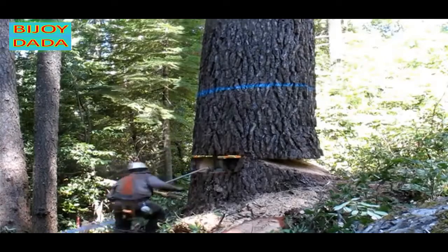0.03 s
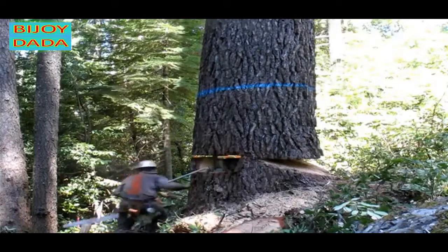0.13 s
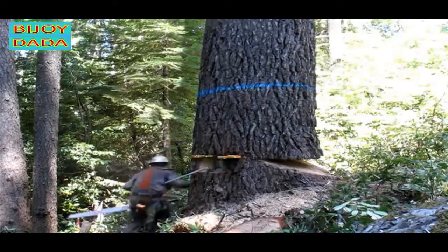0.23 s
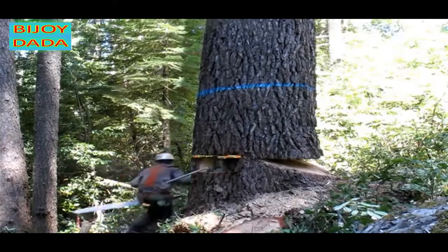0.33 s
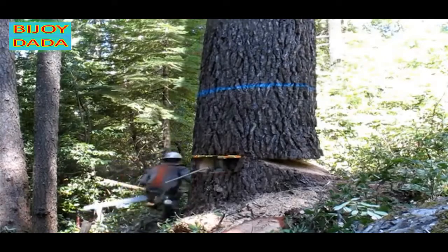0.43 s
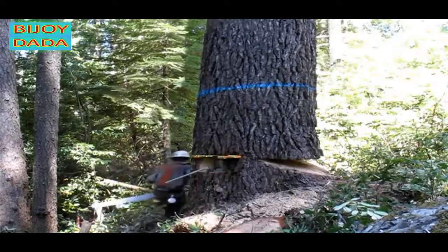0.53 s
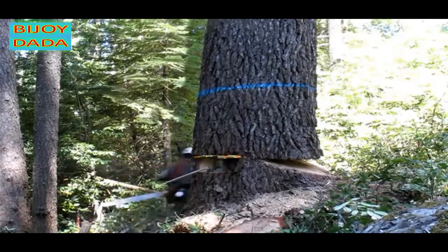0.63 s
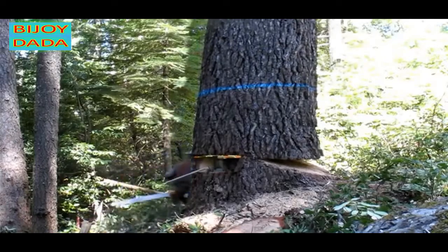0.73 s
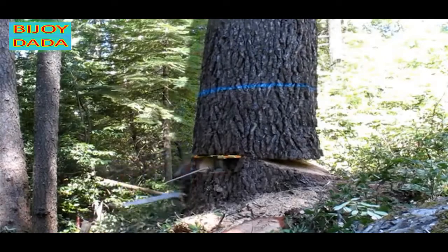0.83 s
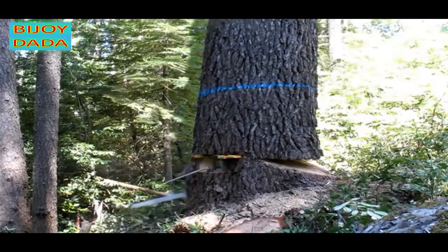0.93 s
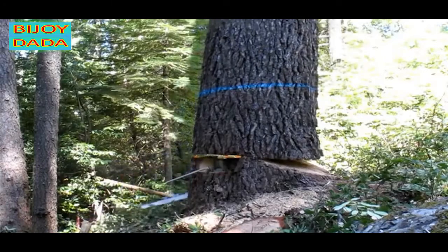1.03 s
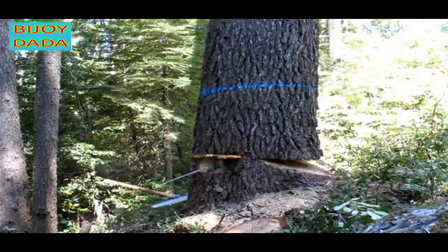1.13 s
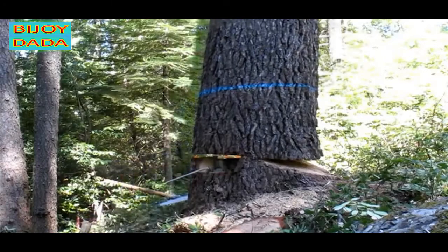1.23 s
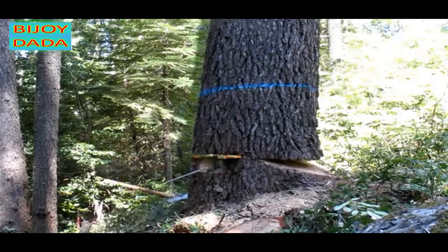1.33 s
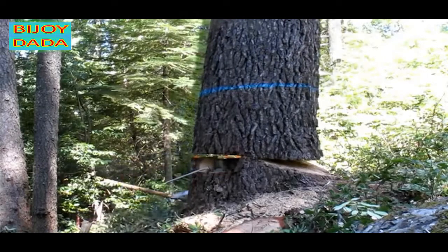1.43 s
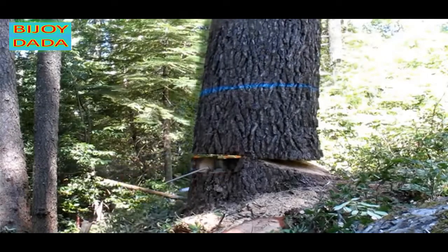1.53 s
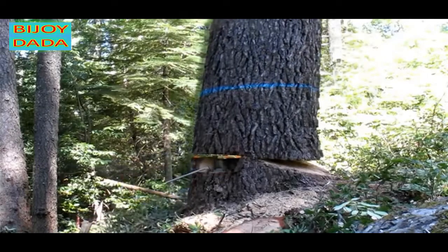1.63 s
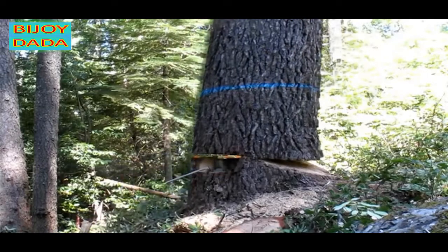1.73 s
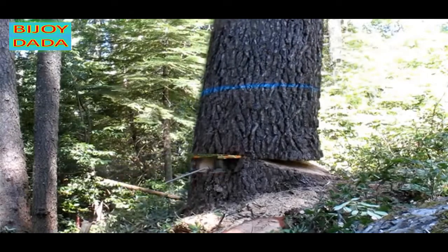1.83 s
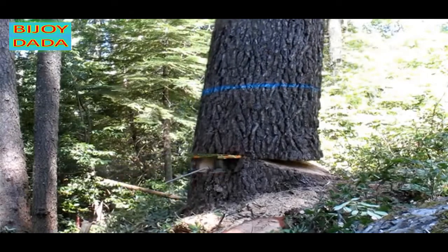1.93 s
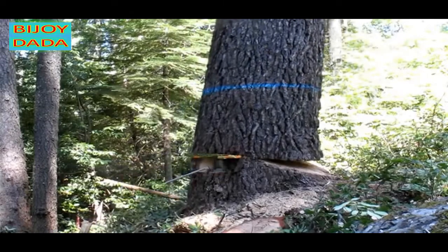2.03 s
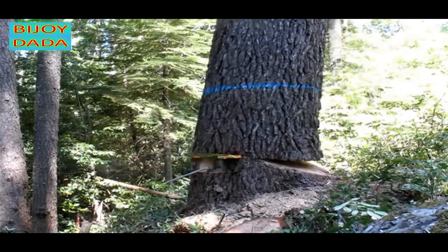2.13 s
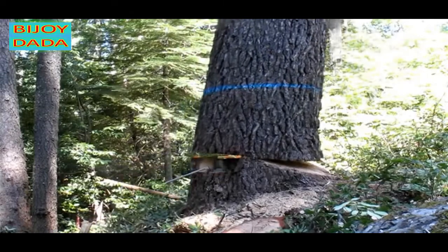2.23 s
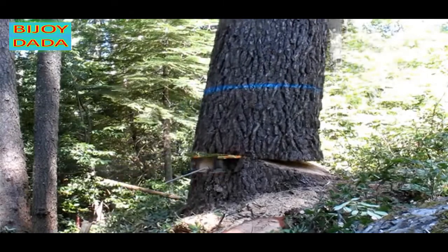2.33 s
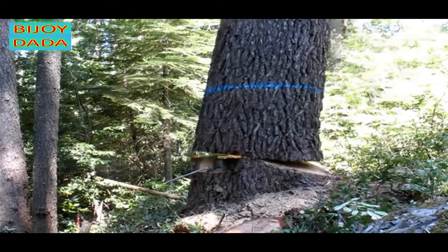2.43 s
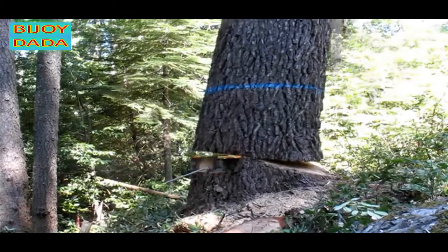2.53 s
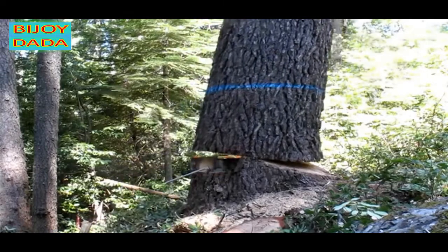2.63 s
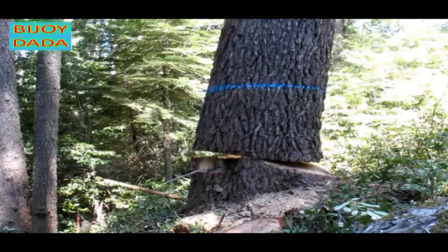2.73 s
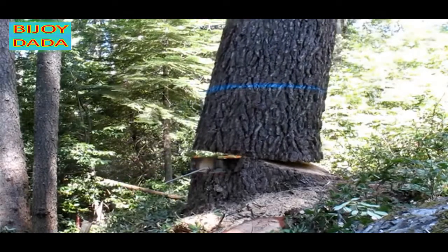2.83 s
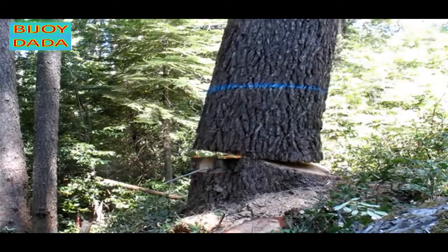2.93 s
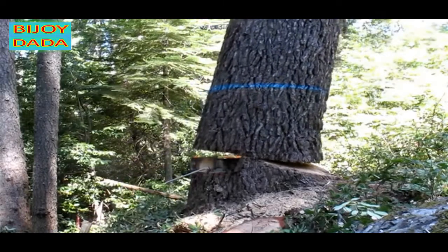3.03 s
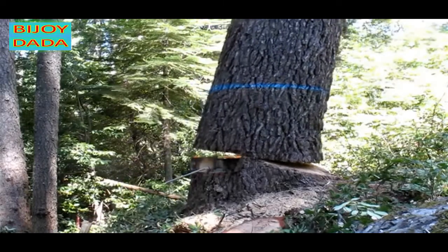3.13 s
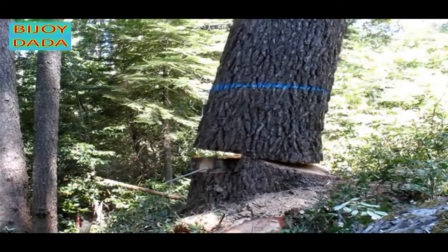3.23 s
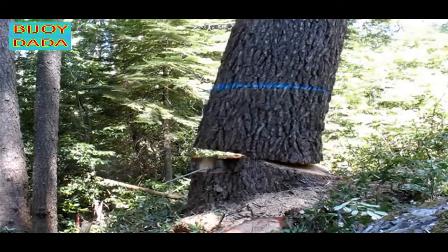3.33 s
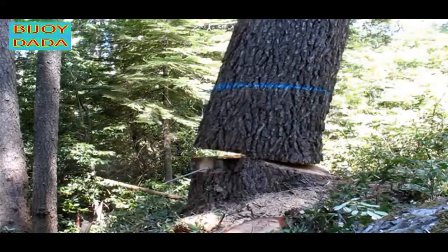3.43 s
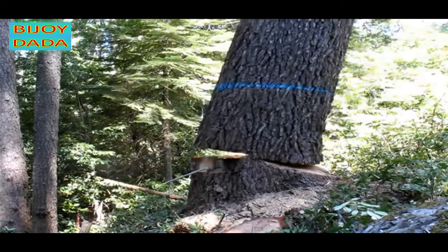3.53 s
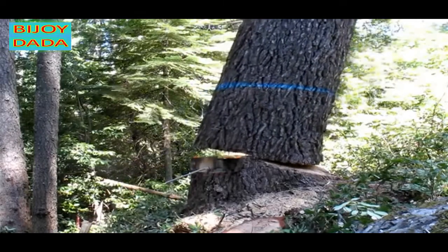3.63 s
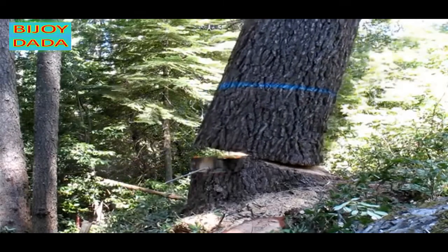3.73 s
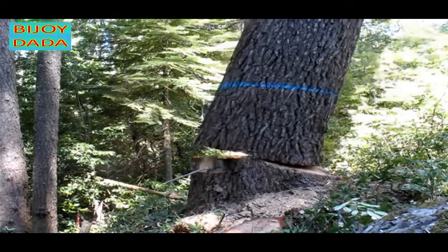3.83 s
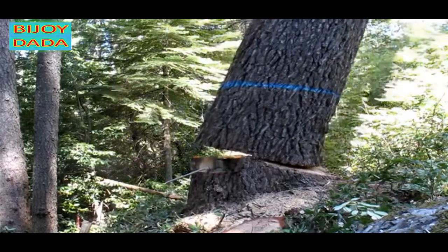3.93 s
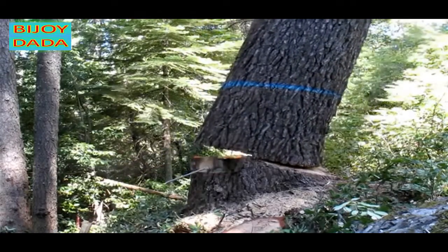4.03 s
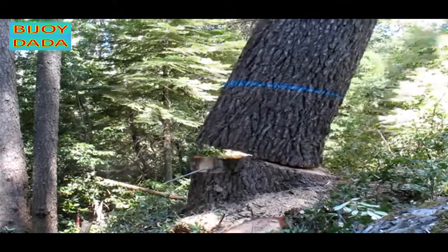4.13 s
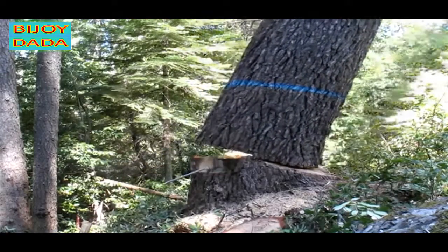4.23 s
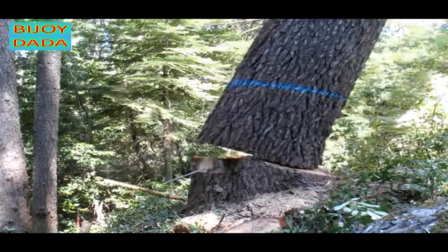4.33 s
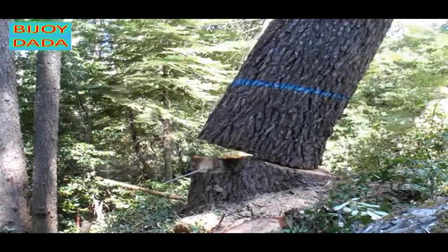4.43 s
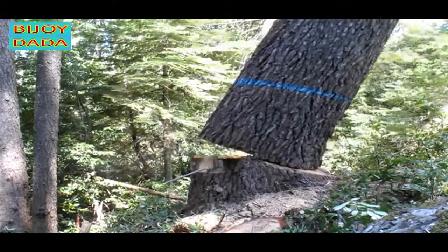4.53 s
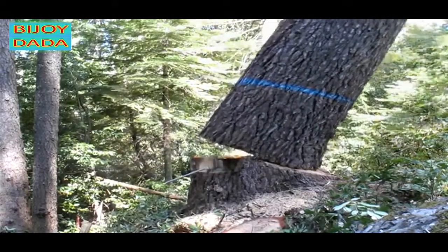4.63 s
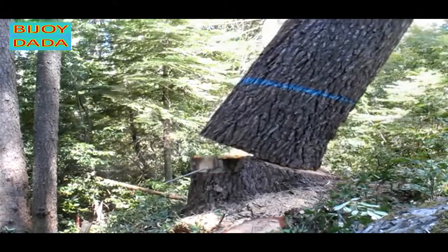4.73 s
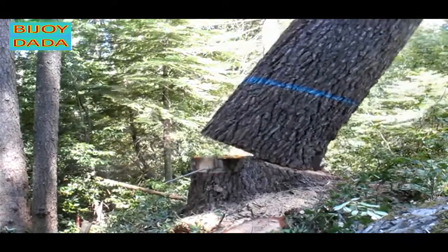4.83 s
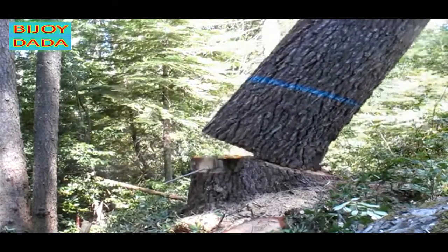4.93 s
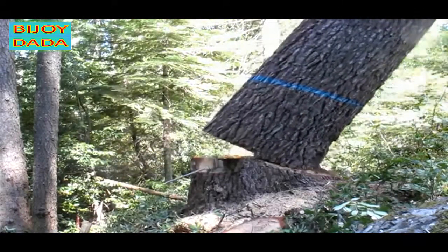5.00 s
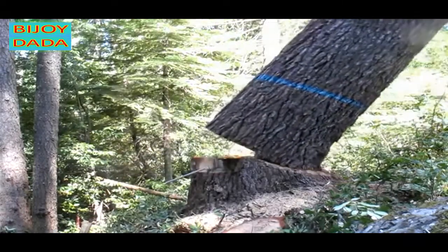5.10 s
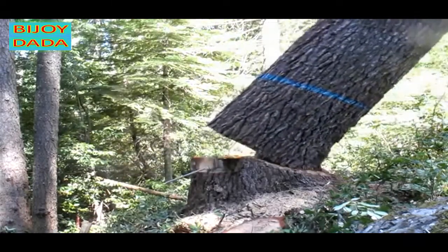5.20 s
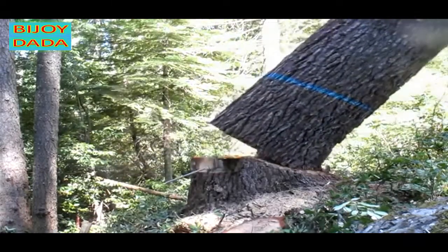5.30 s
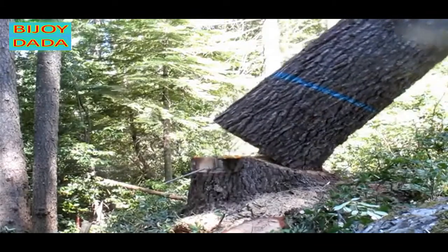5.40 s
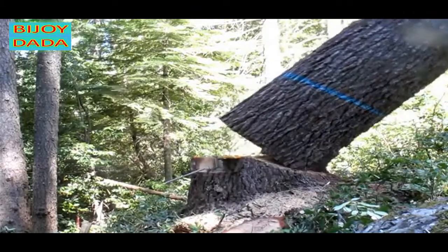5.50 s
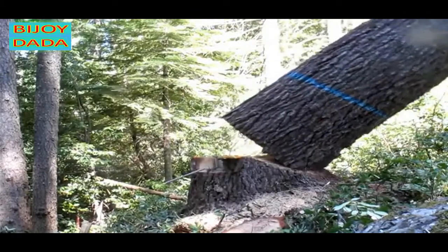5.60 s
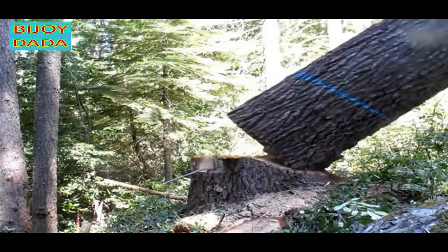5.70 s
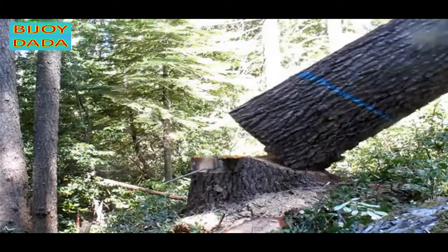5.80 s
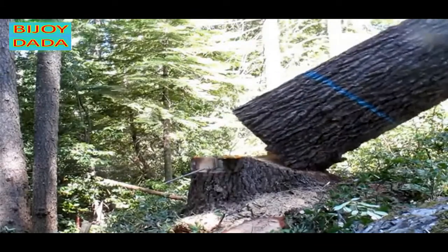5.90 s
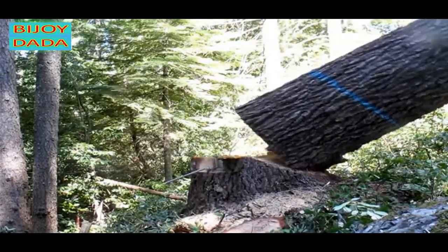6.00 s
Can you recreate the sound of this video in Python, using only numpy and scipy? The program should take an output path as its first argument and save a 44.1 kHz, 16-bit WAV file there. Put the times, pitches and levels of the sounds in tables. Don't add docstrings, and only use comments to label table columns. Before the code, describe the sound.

Soft twig crackles and leaf rustle over low forest air, then a loud isolated wood crack. After a pause, irregular snaps, ticks and deeper splits tumble out with showers of bark and needles. The pops thin a little before the crown breaks through branches in a loud rattling crunch, still going at the end. Slightly dull, compressed small microphone, faint high whine, woodland echo.

```python
import sys
import numpy as np
from scipy import signal
from scipy.fft import rfft, irfft
from scipy.io import wavfile
from scipy.ndimage import uniform_filter1d

SR = 44100
rng = np.random.default_rng(int(sys.argv[2]) if len(sys.argv) > 2 else 0)


def pcm_store(signal):
    levels = np.round(np.clip(np.atleast_2d(signal), -1, 1) * 32767)
    wavfile.write(sys.argv[1], SR, levels.astype(np.int16).T)


def field_ratio(decibels):
    return 10 ** (np.asarray(decibels, dtype=float) / 20)


N = 267201
BURST_N = 2000
BURST_MS = np.arange(BURST_N) * 1000 / SR


def unit(x):
    return x / np.sqrt(np.mean(x ** 2) + 1e-20)


def level_curve(table):
    s, db = np.transpose(table)
    return np.interp(np.arange(N) / SR, s, db)


def colour(x, spectrum):
    hz, db = np.transpose(spectrum)
    grid_hz = np.arange(2049) * SR / 4096 + 1
    log_gain = np.interp(np.log(grid_hz), np.log(hz), db) * np.log(10) / 20
    cepstrum = irfft(log_gain)
    cepstrum[1:2048] *= 2
    cepstrum[2049:] = 0
    return signal.fftconvolve(x, irfft(np.exp(rfft(cepstrum))))[:len(x)]


def ring(x, hz, width_hz):
    r = np.exp(-np.pi * width_hz / SR)
    return signal.lfilter([1, 0, -r], [1, -2 * r * np.cos(2 * np.pi * hz / SR), r * r], x)


def walk(rate_hz):
    hold = int(SR / rate_hz)
    steps = np.repeat(rng.standard_normal(N // hold + 1), hold)
    return unit(uniform_filter1d(uniform_filter1d(steps, hold), hold)[:N])


def grains(rate_hz, spread_db, smear_ms):
    chance, size, noise = rng.random(N), rng.exponential(size=N), rng.standard_normal(N)
    hits = (chance < rate_hz / SR) * field_ratio(spread_db * np.minimum(size, 4))
    fade = np.exp(-1000 / (max(smear_ms, .05) * SR))
    return unit(noise * np.sqrt(signal.lfilter([1], [1, -fade], hits ** 2)))


def swells(table, rise_share):
    t = np.arange(N) / SR
    power = 0
    for s, db, fade_s in table:
        away_s = np.where(t > s, t - s, (s - t) / rise_share)
        power = power + field_ratio(2 * db - 20 * away_s / fade_s)
    return power


def blows(table, push_ms, width_hz, gain_db):
    out = np.zeros(N + BURST_N)
    for s, db, hz in table:
        push = rng.standard_normal(BURST_N) * BURST_MS * np.exp(-BURST_MS / push_ms)
        knock = ring(ring(push, hz, width_hz), hz, 2 * width_hz)
        at = int(s * SR)
        out[at:at + BURST_N] += field_ratio(db + gain_db) * knock / np.abs(knock).max()
    return out[:N]


# (time [s], wood ring [dB],
# pitch [Hz], thud [dB], tear [ms])
SPLITS = [(1.001, -63, 900, -63, 2.1), (1.7225, -21, 1700, -29, 2.3), (2.317, -23.5, 1150, -32, 2.7),
          (2.385, -39, 1600, -70, 4.7), (2.597, -30.5, 1400, -37, 2.8), (2.9045, -26.5, 1080, -36, 3.6),
          (3.117, -27.5, 1450, -34.5, 3.6), (3.255, -43.5, 2500, -60, 6.3), (3.265, -40, 2760, -70, 4),
          (3.316, -38, 950, -43, 6.3), (3.411, -30.5, 1170, -37.5, 8.5), (3.508, -38.5, 1050, -45, 3.9),
          (3.769, -39.5, 1150, -46.5, 6.7), (3.799, -32.5, 1500, -35, 5), (3.811, -54, 930, -52, 3.2),
          (3.997, -44, 1700, -48.5, 3.5), (4.2, -47, 1610, -54, 10), (4.219, -47, 2800, -52, 3),
          (4.395, -40, 1240, -48, 11), (4.609, -47.5, 1500, -49.5, 12), (4.765, -45, 1650, -70, 1.9)]
# (time [s], wood ring [dB], pitch [Hz], thud [dB], tear [ms])
LIMB_BREAKS = [(4.866, -43, 1390, -51, 2.3), (4.983, -45, 1600, -51, 2.1), (5.224, -44, 1150, -62, .8),
               (5.278, -50, 2610, -40.5, 1.2), (5.484, -29.5, 950, -46, 5.3), (5.602, -43, 3190, -46, 1.9),
               (5.654, -32.5, 1120, -44, 1.3), (5.705, -37, 1520, -41, 1.2), (5.831, -34, 1100, -40.5, 4),
               (5.966, -36, 1390, -39, 3.1)]
# (time [s], splinter [dB], wood ring [dB], pitch [Hz], tear [ms])
SNAPS = [(2.238, -42, -39, 4100, .9), (2.317, -44, -50, 3000, 2.7), (2.538, -33.5, -35, 1400, 4.9),
         (2.552, -39, -39, 1900, 3.5), (2.717, -26.5, -23.5, 1940, 4.2), (2.781, -38, -35, 4100, 12),
         (2.811, -36, -36, 3430, 5.7), (2.889, -33.5, -41, 4220, 3), (3.007, -35, -39, 1900, 5.8),
         (3.139, -38, -37.5, 3750, 5.5), (3.199, -35.5, -44, 1790, 6), (3.393, -35.5, -38, 1900, 1.4),
         (3.434, -27, -35, 1400, 3.2), (3.537, -33.5, -37.5, 1700, 2.7), (3.9, -33, -40.5, 3620, 8.7),
         (3.959, -38, -35.5, 2940, 3.1), (3.98, -29, -31.5, 3800, 2.1), (4.039, -40, -37, 3300, 3.5),
         (4.363, -28, -33, 3500, 1.5), (4.677, -36.5, -52, 2330, 7.4), (4.696, -41.5, -45, 1430, 1.8),
         (4.781, -36.5, -40.5, 3600, 1.7)]
# (time [s], splinter [dB], wood ring [dB], pitch [Hz])
TICKS = [(2.301, -58, -80, 4130), (2.477, -44.5, -43, 2830), (2.515, -48, -47, 3800),
         (2.637, -54, -45.5, 3900), (2.661, -44.5, -45, 2300), (3.306, -48, -47, 2380),
         (3.369, -40.5, -45, 1770), (3.471, -42, -55, 1720), (3.549, -44, -66, 3450),
         (3.571, -46, -44, 3400), (3.656, -43, -59, 3190), (3.695, -40, -44, 2830), (3.712, -42, -48, 3960),
         (3.756, -42, -50, 1620), (3.283, -44, -43, 2200), (3.971, -44, -45, 2450),
         (4.112, -42.5, -57, 3400), (4.121, -42, -46, 1500), (4.302, -41.5, -48, 1600),
         (4.422, -43, -57, 2110), (4.549, -47, -48.5, 2000), (4.638, -49, -49, 1220),
         (4.74, -43.5, -46, 2850), (2.76, -44, -46, 3300), (2.678, -50, -47, 2300), (2.584, -46, -50, 3000),
         (3.382, -44, -44, 3300), (3.46, -47, -48, 3000), (3.68, -52, -52, 1500), (3.737, -50, -52, 3000),
         (3.887, -48, -47, 3300), (3.822, -46, -45, 3700), (3.949, -45, -48, 3000), (4.135, -50, -50, 3200),
         (4.235, -52, -49, 2000), (4.335, -52, -52, 3000), (4.41, -50, -47, 2500), (2.946, -50, -44, 1900)]
# (time [s], splinter [dB], wood ring [dB], pitch [Hz], tear [ms])
BRANCH_BREAKS = [(4.824, -40.5, -64, 3490, .8), (4.866, -43, -50, 3000, 2.3), (5.058, -36, -43, 2900, 4.7),
                 (5.111, -41, -39, 3960, 8.4), (5.189, -39.5, -53, 2450, 3),
                 (5.245, -30.5, -31.5, 2610, 1.2), (5.288, -34.5, -45, 1420, 7.5),
                 (5.32, -41, -32, 2420, 5), (5.373, -33.5, -27, 1800, 2.6), (5.422, -36, -30, 1050, 14),
                 (5.524, -39, -35, 1140, 6.4), (5.614, -36, -27, 1500, 2.7), (5.637, -28, -30, 3800, 1.1),
                 (5.719, -52, -35, 1380, 3.9), (5.769, -34, -34, 2870, 2.2), (5.831, -35, -45, 3000, 4),
                 (5.987, -33, -34, 1820, 2.1)]
# (time [s], splinter [dB], wood ring [dB], pitch [Hz], tear [ms])
TWIGS = [(0.074, -61, -65, 3700, 6.5), (0.126, -48, -64, 1890, 1.2), (0.154, -66, -60, 4200, 3.3),
         (0.178, -50.5, -55.5, 2060, 7.4), (0.287, -61, -77, 3730, 3), (0.41, -54, -56, 4300, 2.5),
         (0.511, -53.5, -61, 3510, 13.5), (0.548, -66, -57, 2600, 1.7), (0.727, -51, -69, 4200, 3.7),
         (0.976, -61, -63, 4030, 2.5), (1.499, -51.5, -62, 1940, 3.9), (1.552, -63, -57, 3000, 5),
         (1.589, -61, -58, 3060, 8)]


def fractures():
    strands = [(*tick, 3.5) for tick in TICKS]
    thick = [(s, thud, wood, hz, wood - 22, ms) for s, wood, hz, thud, ms in SPLITS + LIMB_BREAKS]
    thin = [(s, wood - 22, wood, hz, splinter, ms)
            for s, splinter, wood, hz, ms in TWIGS + SNAPS + BRANCH_BREAKS + strands]
    return thick + thin


# (frequency [Hz], width [Hz], level [dB])
STUMP = [(560, 170, -9), (1070, 150, 0), (1380, 190, -7), (1750, 150, -1), (2300, 180, -2), (3050, 320, 3),
         (3750, 180, -3)]


def stump(x, hz, reach_oct):
    out = 0
    for mode_hz, width_hz, db in STUMP:
        distance = np.log2(mode_hz / hz) / reach_oct
        out = out + field_ratio(db - 6 * min(distance ** 2, 3)) * unit(ring(x, mode_hz, width_hz))
    return out


# (time [s], centre [Hz], reach [octaves])
RINGING = [(1.7225, 1900, 2.2), (2.317, 1050, .75), (2.597, 2200, 1.5), (2.717, 2250, .75),
           (2.9045, 1090, .35), (3.117, 1500, 1.2), (3.316, 1100, .6), (3.411, 1400, .7), (3.508, 1200, .7),
           (3.799, 1400, .9)]


def wood_ring(s, hz, first, middle):
    wood = unit(ring(middle, hz, 660)) + 0.87 * unit(ring(first, 2300 + 1400 * rng.random(), 2700))
    wood = unit(signal.sosfilt(signal.butter(2, [700, 4000], "band", fs=SR, output="sos"), wood))
    for split_s, centre_hz, reach_oct in RINGING:
        if abs(split_s - s) < .005:
            wood = .25 * wood + .75 * unit(stump(middle, centre_hz, reach_oct))
    if s > 5.0 and hz < 2000:
        wood = unit(.6 * wood + unit(ring(ring(middle, hz, 350), hz, 700)))
    return wood


def cracks():
    near, sent = np.zeros(N + 4000), np.zeros(N + 4000)
    ms = BURST_MS
    click = np.eye(1, BURST_N)[0]
    sharp = signal.butter(2, 3800.5, "high", fs=SR, output="sos")
    deep = unit(ring(click, 90, 85))
    scale = np.sqrt(441 / BURST_N)
    for s, thud_db, wood_db, hz, splinter_db, tear_ms in fractures():
        noise, size = rng.standard_normal((3, BURST_N)), rng.exponential(size=BURST_N)
        tear = np.clip(tear_ms, .8, 14)
        snaps = noise * size ** 0.56 * (1 - np.exp(-ms / 0.2))
        first, middle, last = (run / (1 + (ms / (share * tear)) ** 1.7)
                               for run, share in zip(snaps, (.45, .65, .85)))
        wood = wood_ring(s, hz, first, middle)
        thud = unit(ring(ring(last, 500 + 90 * rng.random(), 320), 520, 600))
        low_thud = unit(ring(ring(last, 310, 240), 310, 340))
        spray = ring(first * np.exp(-ms / (.5 * tear)), 4700 + 3300 * rng.random(), 8000)
        chips = noise[2] * np.exp(-ms / 13)
        splinter = unit(signal.sosfilt(sharp, spray)) + 0.5 * unit(signal.sosfilt(sharp, chips))
        boom = field_ratio(thud_db - 25.5) * deep
        crack = field_ratio(thud_db - 13) * low_thud + field_ratio(thud_db - 1.2) * thud
        crack = crack + field_ratio(wood_db) * wood + field_ratio(splinter_db) * splinter
        broad = field_ratio(thud_db + .1) * unit(ring(click, 480, 500))
        broad = broad + field_ratio(wood_db) * unit(ring(click, .65 * hz + 550, 1500))
        broad = broad + field_ratio(splinter_db + 0.3) * unit(signal.sosfilt(sharp, click))
        at = int(s * SR)
        near[at:at + BURST_N] += (crack + boom) * scale
        sent[at:at + BURST_N] += (broad + boom) * scale
    lag = int(.0131 * SR)
    near[lag:] += field_ratio(-22) * near[:-lag]
    return near[:N], sent[:N]


# (peak time [s], level [dB], fade [s per 10 dB])
FRAY = [(2.38, -50, .2), (2.61, -44, .03), (2.74, -42, .07), (2.93, -37, .05), (3.14, -48, .3),
        (3.41, -41, .11), (3.77, -40.5, .1), (3.98, -44, .12), (4.2, -48, .2), (4.38, -46, .2),
        (4.58, -46, .5), (4.93, -47, .08), (4.7, -48, .03), (4.86, -44, .04)]
# (frequency [Hz], density [dB per Hz])
THICK = [(100, -21), (400, 0.5), (1200, 4), (3000, 6), (6000, -1), (12000, -39)]


def fray():
    pops = unit(colour(grains(420, 3.3, 0.7), THICK))
    return field_ratio(-5.5) * np.sqrt(swells(FRAY, rise_share=.2)) * pops


# (time [s], level [dB])
CRASH = [
    (4.8, -55),
    (5.08, -51),
    (5.18, -50.5),
    (5.24, -39),
    (5.3, -42),
    (5.36, -36.5),
    (5.51, -37.5),
    (5.59, -36),
    (6.06, -37.5),
]
# (frequency [Hz], density [dB per Hz])
BRANCH = [(600, -15), (880, -14), (1100, -.5), (1600, 1), (2000, -2), (3300, -4.5), (6000, -9.5),
          (12000, -43)]
# (frequency [Hz], density [dB per Hz])
LIMB = [(25, -27), (55, -8), (110, -6), (175, 3), (370, -2.5), (600, -5), (900, -17), (1500, -44.5)]


def crash():
    branch_db = level_curve([(CRASH[0][0] - .2, -90)] + list(CRASH))
    lead_s = .04
    limb_db = np.interp(np.arange(N) + lead_s * SR, np.arange(N), branch_db) * 1.3 + 1.5
    rattle = 0
    for hz in 800 * 1.5 ** np.arange(6):
        band = signal.butter(2, [hz / 1.25, hz * 1.25], "band", fs=SR, output="sos")
        rattle = rattle + signal.sosfilt(band, grains(300, 3.1, 2.4))
    branch = unit(colour(rattle, BRANCH))
    limb = unit(colour(grains(200, 2.6, 5.5), LIMB))
    return field_ratio(branch_db) * branch + field_ratio(limb_db) * limb


# (time [s], peak [dB], pitch [Hz])
KNOCKS = [(5.0357, -42, 1260), (5.0582, -37, 1310), (5.1001, -40, 1270), (5.1161, -39, 2160),
          (5.1919, -41, 2270), (5.2243, -30, 1250), (5.2433, -27, 1180), (5.2767, -31, 1300),
          (5.3206, -27, 2300), (5.3595, -22, 1590), (5.374, -19, 1530), (5.3994, -25, 1620),
          (5.4279, -26, 2300), (5.4279, -24, 1590), (5.4857, -22, 1100), (5.5082, -28, 1610),
          (5.5221, -25, 1120), (5.5526, -27, 1400), (5.57, -29, 1180), (5.6139, -20, 1610),
          (5.6374, -22, 1330), (5.6543, -21, 1670), (5.7027, -22, 1630), (5.7187, -21, 1420),
          (5.7536, -27, 1790), (5.7955, -28, 1460), (5.8304, -27, 1610), (5.8589, -26, 1730),
          (5.8948, -24, 1550), (5.9252, -24, 1860), (5.9517, -27, 1360), (5.9671, -22, 1420),
          (5.9871, -23, 1800), (6.0165, -29, 2290), (6.033, -26, 1300)]


def knocks():
    return blows(KNOCKS, push_ms=.9, width_hz=330, gain_db=-2.5)


# (time [s], peak [dB], pitch [Hz])
THUMPS = [(5.079, -52, 234), (5.121, -47, 291), (5.159, -50, 172), (5.199, -37, 307), (5.22, -33, 482),
          (5.272, -31, 433), (5.289, -39, 223), (5.306, -30, 175), (5.359, -31, 385), (5.41, -30, 396),
          (5.439, -33, 439), (5.463, -35, 393), (5.507, -34, 353), (5.557, -30, 428), (5.574, -31, 471),
          (5.598, -27, 358), (5.639, -29, 345), (5.652, -26, 336), (5.687, -29, 264), (5.719, -32, 450),
          (5.757, -31, 301), (5.828, -26, 358), (5.854, -33, 234), (5.892, -29, 444), (5.924, -31, 191),
          (5.965, -22, 256), (5.977, -24, 320), (6.009, -34, 460), (6.049, -33, 323)]


def thumps():
    return blows(THUMPS, push_ms=1.6, width_hz=190, gain_db=-2.5)


# (time [s], peak [dB], pitch [Hz])
LURCHES = [
    (5.261, -58, 140),
    (5.265, -40, 94.2),
    (5.575, -51, 64.6),
]


def lurches():
    return blows(LURCHES, push_ms=4, width_hz=70, gain_db=-3)


# (time [s], peak [dB], pitch [Hz])
TAPS = [
    (.125, -45, 1900),
    (.177, -52, 2000),
]


def taps():
    return blows(TAPS, push_ms=.6, width_hz=180, gain_db=-1)


# (frequency [Hz], t60 [s], level [dB])
FOREST = [(73.7, 0.43, 5), (285, 0.59, -2), (476, 1.3, -6), (700, 1.7, -5), (1100, 1.12, -3),
          (1580, 1.07, -2.5), (2300, 1.08, -2.5), (3340, 0.52, -4), (4800, 0.8, -5), (7440, 0.76, -9)]


def forest(x):
    t = np.arange(int(1.5 * SR)) / SR
    trunks = rng.exponential(size=len(t) // 64 + 1).repeat(64)[:len(t)] ** .25
    build = np.clip((t - .008) / 0.034, 0, 1) ** 0.36
    echo = 0
    for hz, t60_s, db in FOREST:
        edges = signal.butter(2, [hz / 1.35, hz * 1.35], "band", fs=SR, output="sos")
        band = signal.sosfilt(edges, trunks * rng.standard_normal(len(t)))
        fading = band * build * field_ratio(-60 * t / t60_s)
        echo = echo + field_ratio(db) * fading / np.sqrt(np.sum(fading ** 2)) * np.sqrt(hz / SR * 2)
    return signal.fftconvolve(x, echo)[:N]


# (time [s], level [dB])
RUSTLE = [(0, -71), (.63, -71), (.8, -63), (1.18, -64), (1.54, -65), (2.05, -61), (2.5, -59.5),
          (3.1, -57.5), (3.7, -56.5), (4.6, -57), (4.76, -55), (4.83, -48), (5.05, -45.5), (5.3, -42.5),
          (6.06, -41)]
# (peak time [s], level [dB], fade [s per 10 dB])
SHOWERS = [(.16, -61, .07), (.525, -59, .05), (.73, -55, .15), (1.29, -58, .2), (1.42, -61, .05),
           (1.61, -55.5, .15), (1.79, -56, .12), (1.95, -56, .12), (2.37, -56, .15), (2.55, -53, .2),
           (2.77, -42.5, .09), (2.92, -51, .12), (3.025, -48, .04), (3.21, -44.5, .14), (3.43, -42, .09),
           (3.56, -46, .08), (3.81, -47.5, .15), (3.99, -42, .09), (4.13, -50, .08), (4.38, -49, .13),
           (4.83, -47, .1), (5.28, -42, .1)]
# (frequency [Hz], density [dB per Hz])
NEEDLES = [(300, -13), (1000, -40), (2500, -6), (4000, 1), (7000, 1), (10500, 3.5), (13000, 6),
           (16500, -6.5)]


def rustle():
    stir = np.sqrt(field_ratio(2 * level_curve(RUSTLE)) + swells(SHOWERS, rise_share=.36))
    fine = unit(colour(grains(2500, 2.2, .45), NEEDLES)) * field_ratio(.9 * walk(40))
    coarse = unit(colour(grains(900, 3.1, 3.6), THICK))
    return field_ratio(5.08) * stir * (fine + 0.17 * coarse)


# (frequency [Hz], density [dB per Hz])
AIR = [(25, -2), (100, -5), (300, -8.5), (1000, -3), (2000, -10.5), (5000, -31.5), (10000, -13),
       (16000, -14.5)]


def air():
    return field_ratio(-71.5 + 0.55 * walk(3.8)) * unit(colour(rng.standard_normal(N), AIR))


def scene():
    near, sent = cracks()
    small = fray() + crash() + thumps() + knocks()
    echo = forest(field_ratio(-10.0) * sent + field_ratio(-6.5) * small)
    return (near + small + taps() + lurches() + echo + rustle() + air())[None]


def roll_off(x):
    return signal.sosfilt(signal.butter(12, 16670, fs=SR, output="sos"), x)


# (frequency [Hz], gain [dB])
MIC = [(20, 1), (60, 0.5), (120, 1.5), (175, 0), (240, 1.5), (11500, -2), (12500, -7), (13200, -21.5),
       (13700, -18), (14050, -21), (15300, -17), (16000, -19), (16600, -40)]


def record(dry):
    whine_hz, peak_limit = 6828.5, .165
    whine = field_ratio(-66) * np.sin(2 * np.pi * whine_hz * np.arange(N) / SR)
    heard = colour(dry[0], MIC) + whine
    soft = heard / (1 + np.abs(heard / peak_limit) ** 4) ** .25
    soft = signal.sosfilt(signal.ellip(8, .2, 60, 16100, fs=SR, output="sos"), soft)
    return roll_off(soft[None])


dry = scene()
out = record(dry)
pcm_store(out)
```